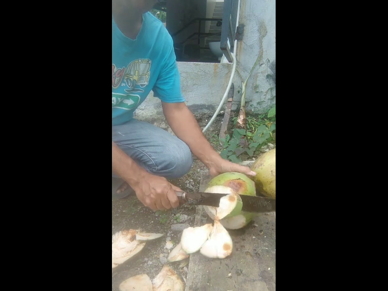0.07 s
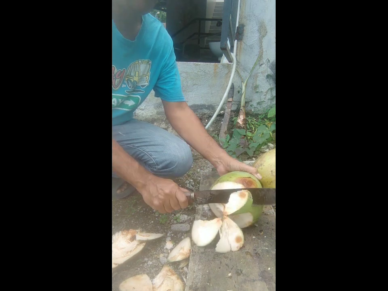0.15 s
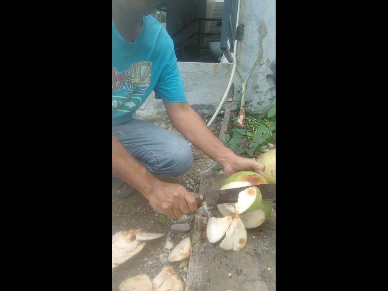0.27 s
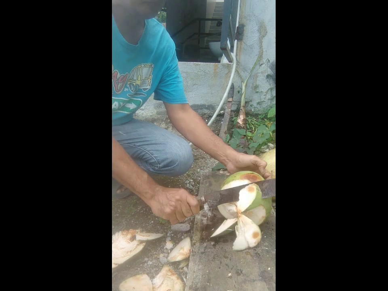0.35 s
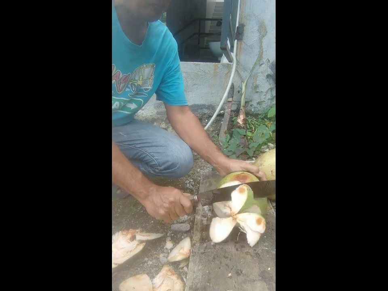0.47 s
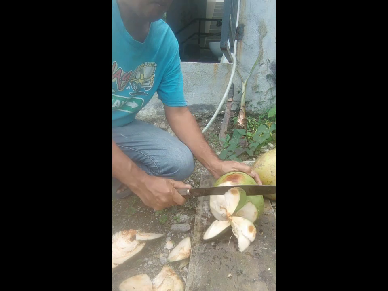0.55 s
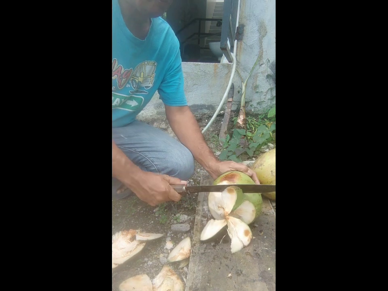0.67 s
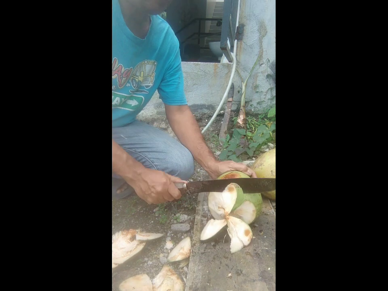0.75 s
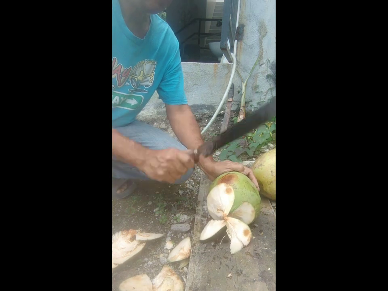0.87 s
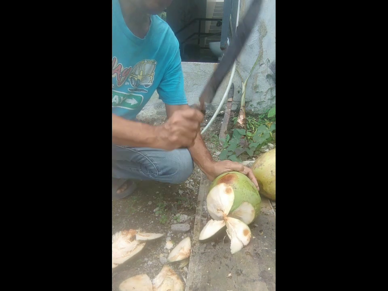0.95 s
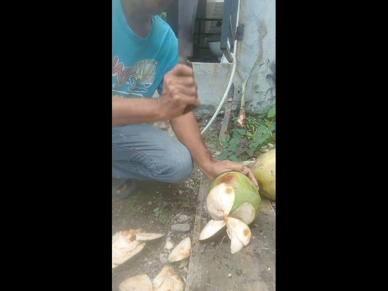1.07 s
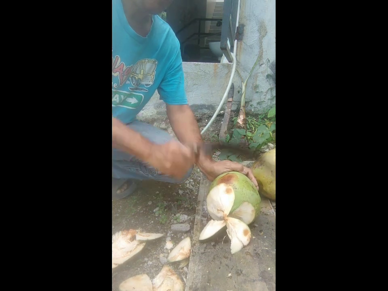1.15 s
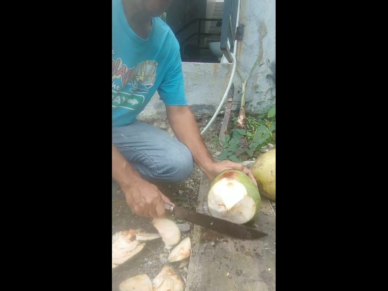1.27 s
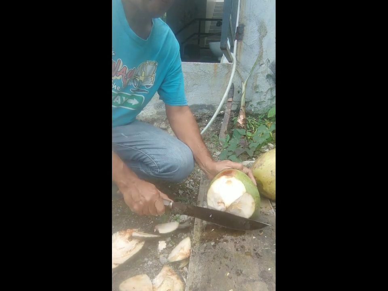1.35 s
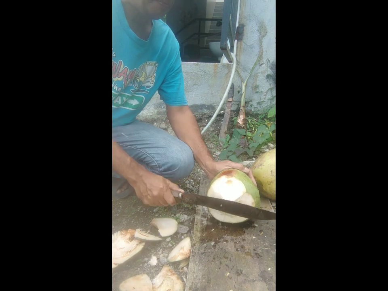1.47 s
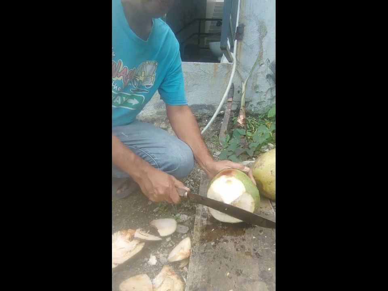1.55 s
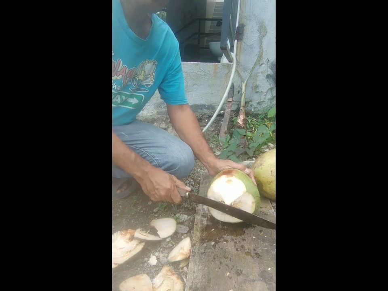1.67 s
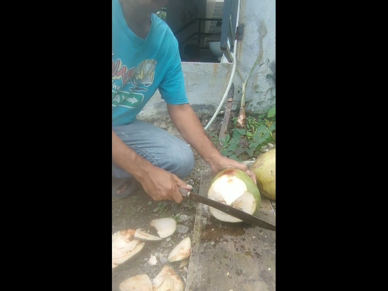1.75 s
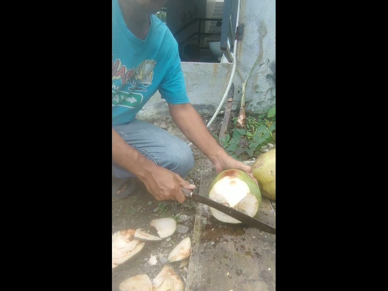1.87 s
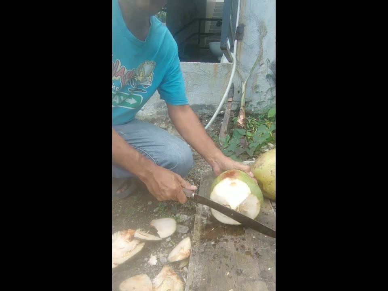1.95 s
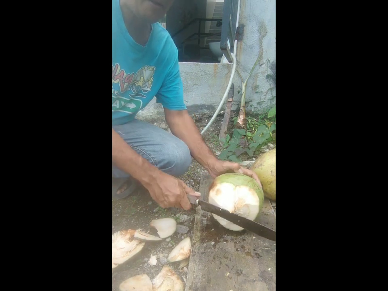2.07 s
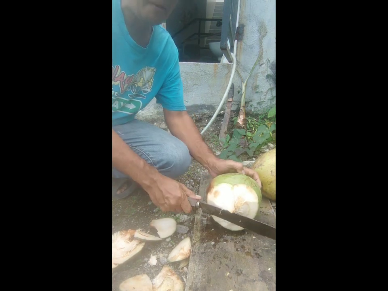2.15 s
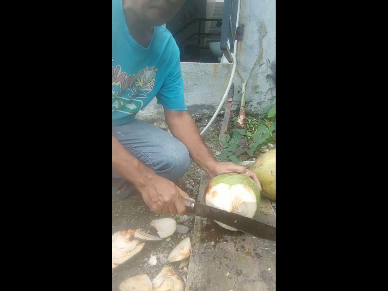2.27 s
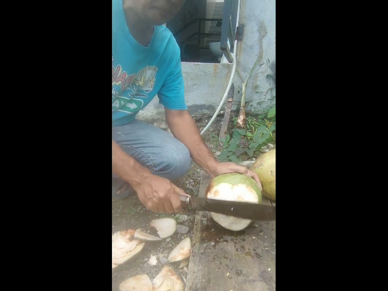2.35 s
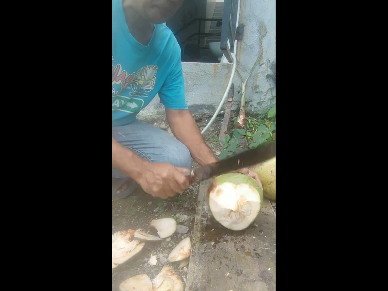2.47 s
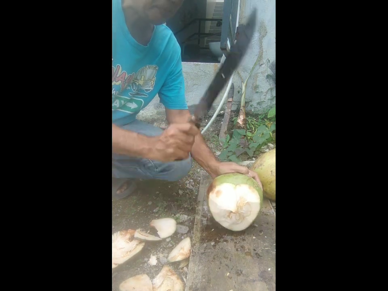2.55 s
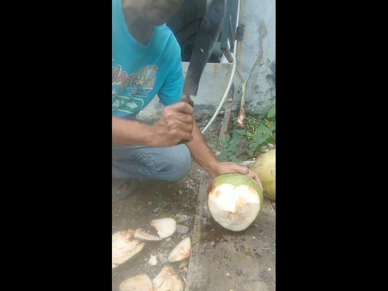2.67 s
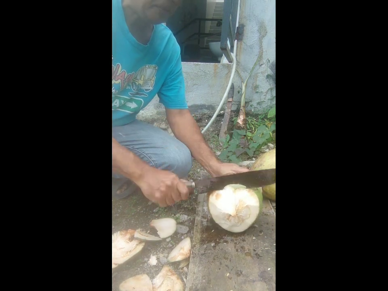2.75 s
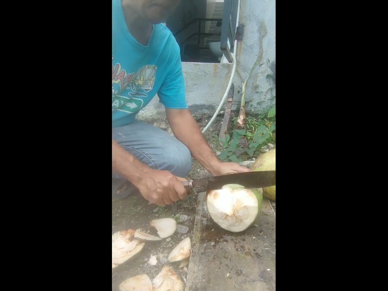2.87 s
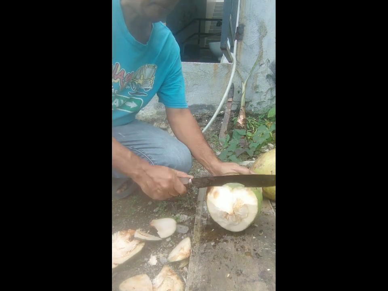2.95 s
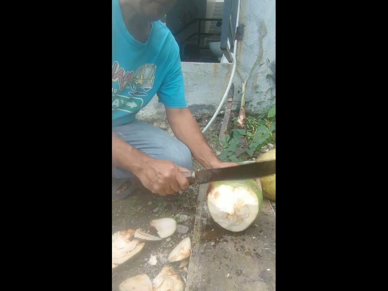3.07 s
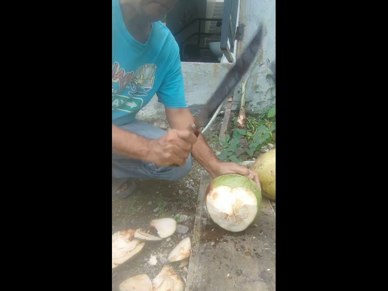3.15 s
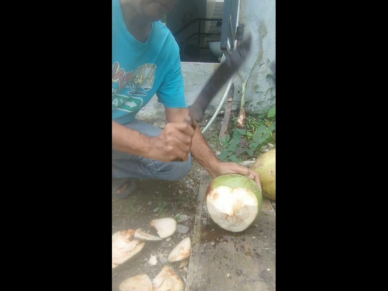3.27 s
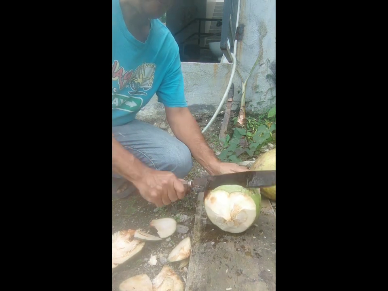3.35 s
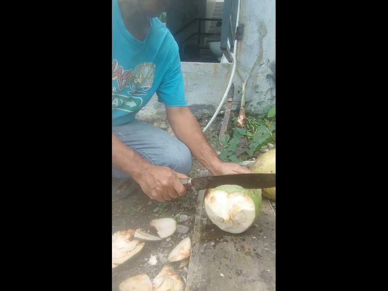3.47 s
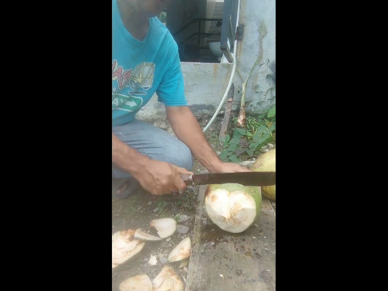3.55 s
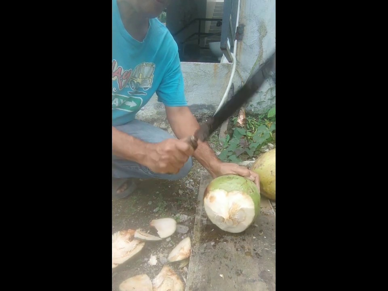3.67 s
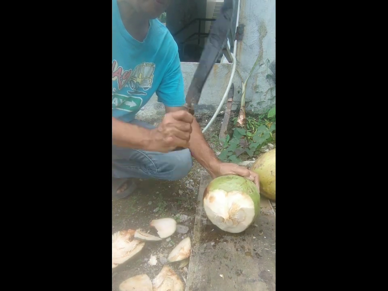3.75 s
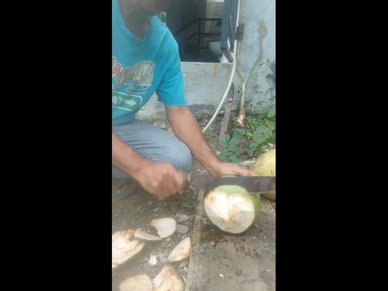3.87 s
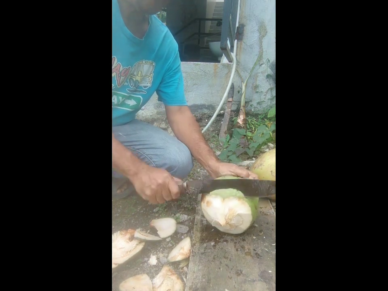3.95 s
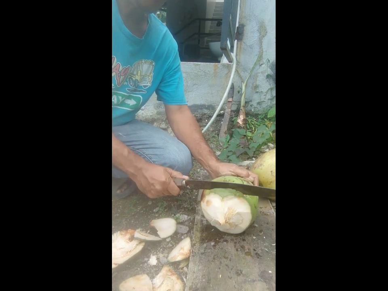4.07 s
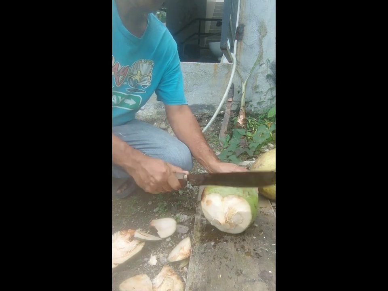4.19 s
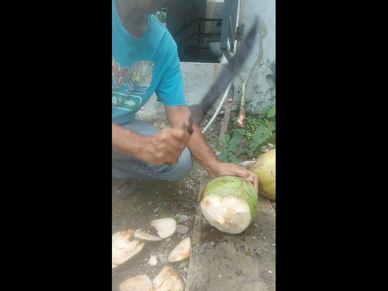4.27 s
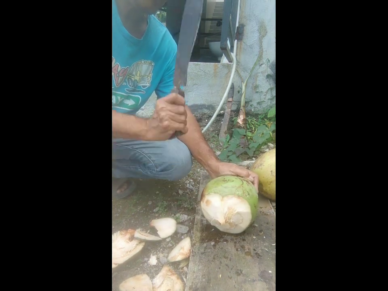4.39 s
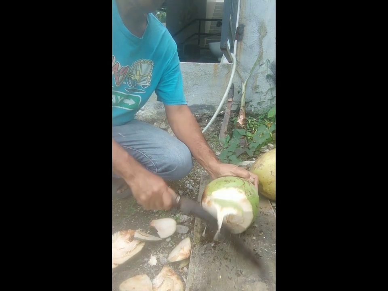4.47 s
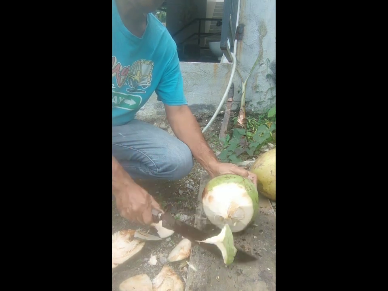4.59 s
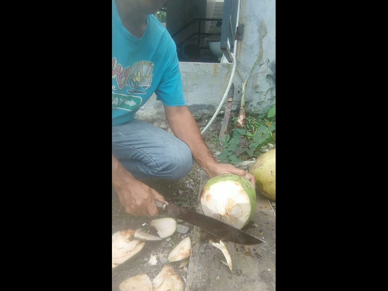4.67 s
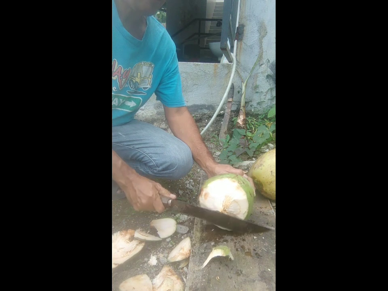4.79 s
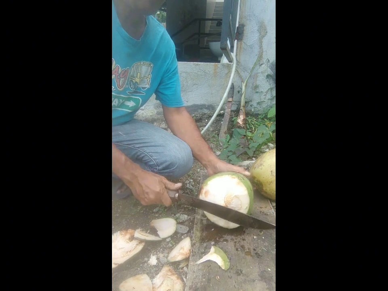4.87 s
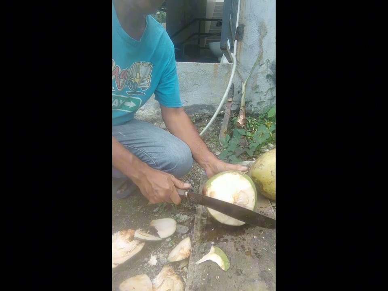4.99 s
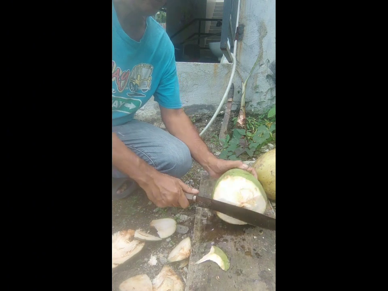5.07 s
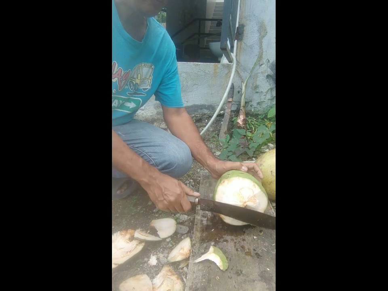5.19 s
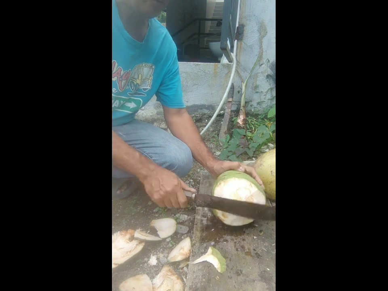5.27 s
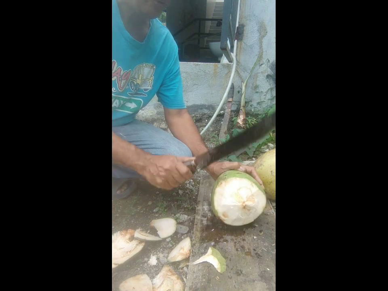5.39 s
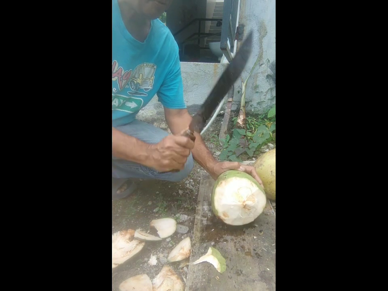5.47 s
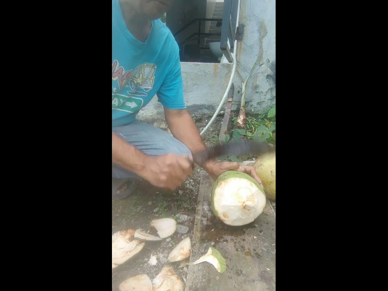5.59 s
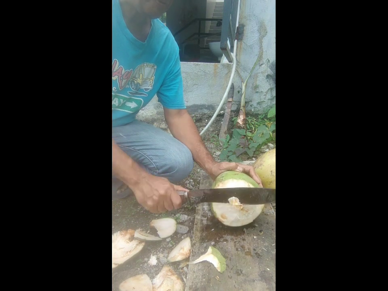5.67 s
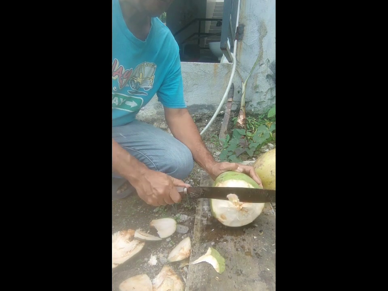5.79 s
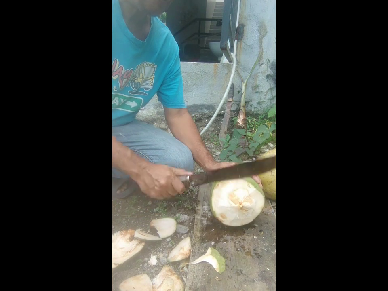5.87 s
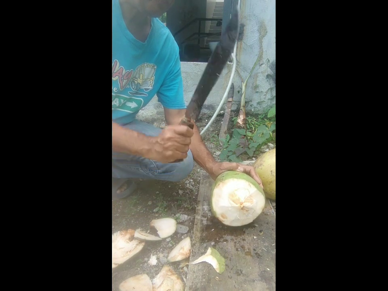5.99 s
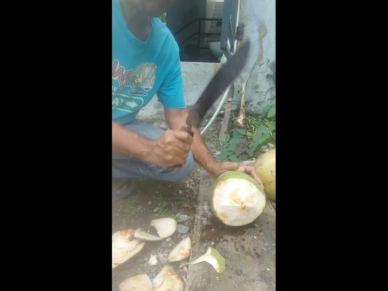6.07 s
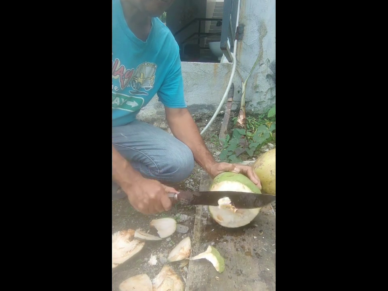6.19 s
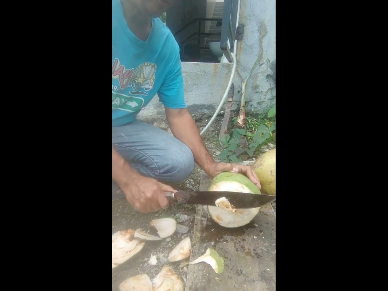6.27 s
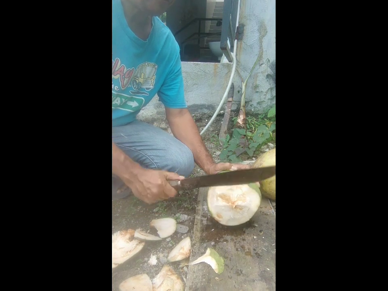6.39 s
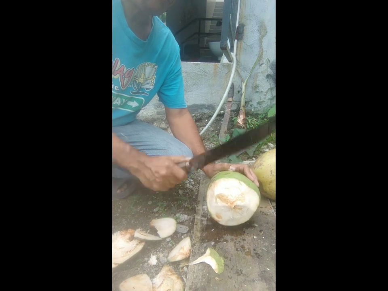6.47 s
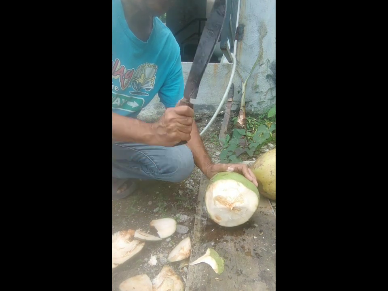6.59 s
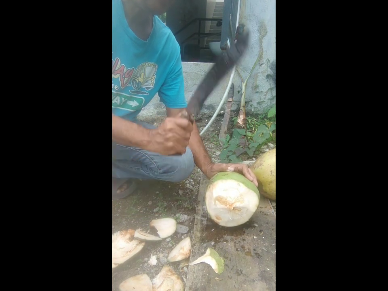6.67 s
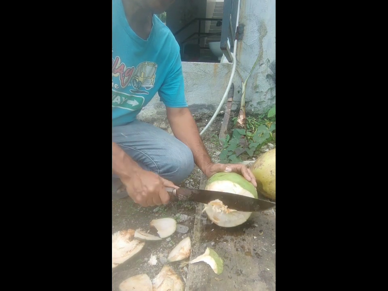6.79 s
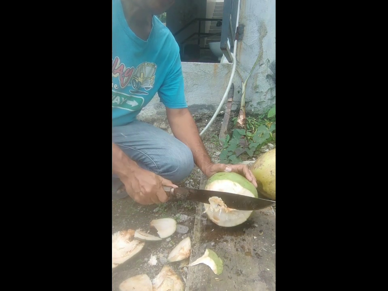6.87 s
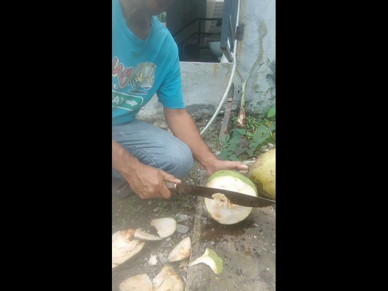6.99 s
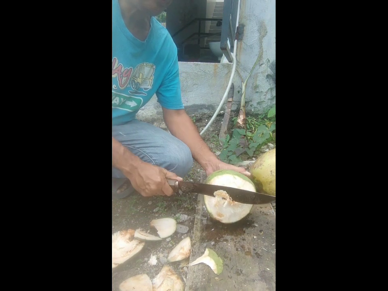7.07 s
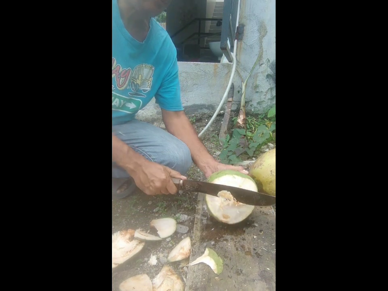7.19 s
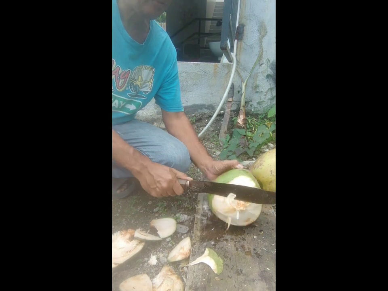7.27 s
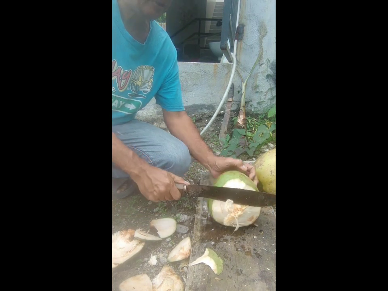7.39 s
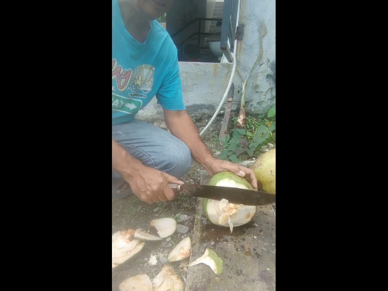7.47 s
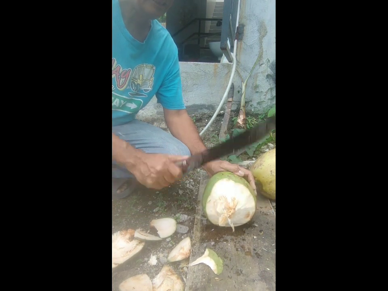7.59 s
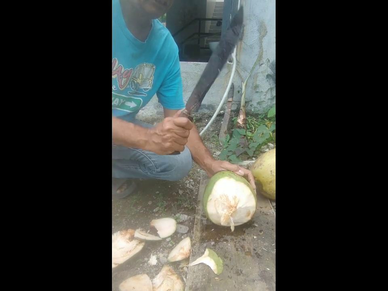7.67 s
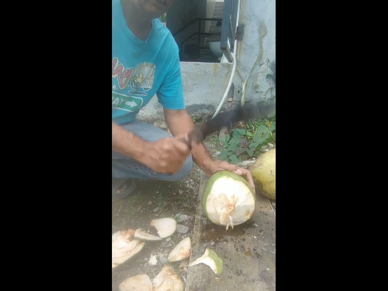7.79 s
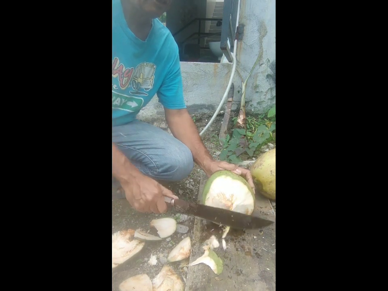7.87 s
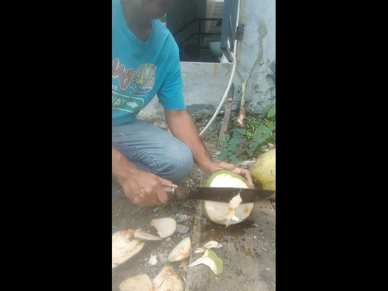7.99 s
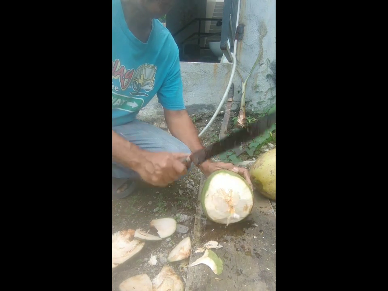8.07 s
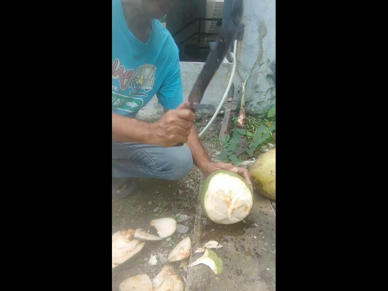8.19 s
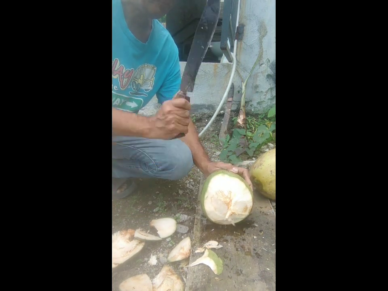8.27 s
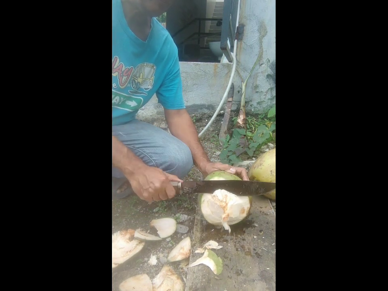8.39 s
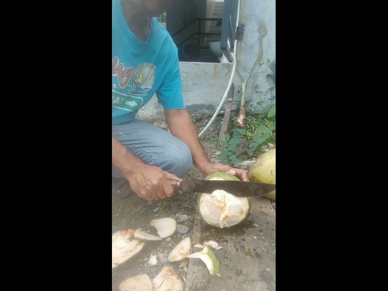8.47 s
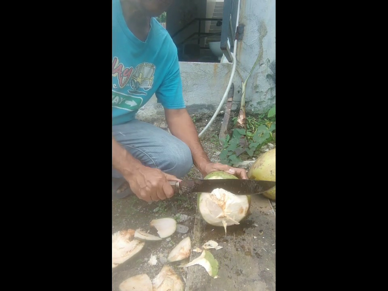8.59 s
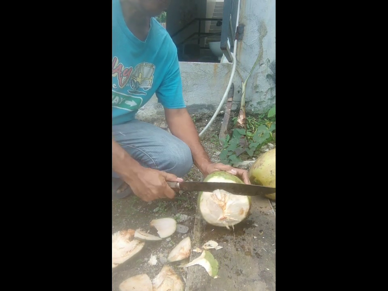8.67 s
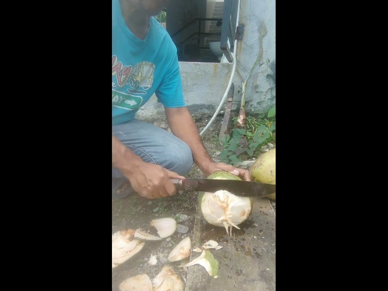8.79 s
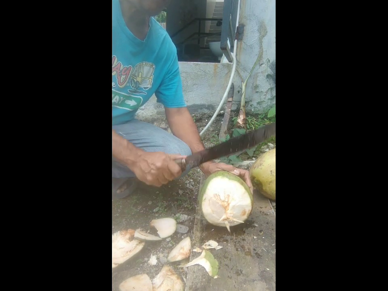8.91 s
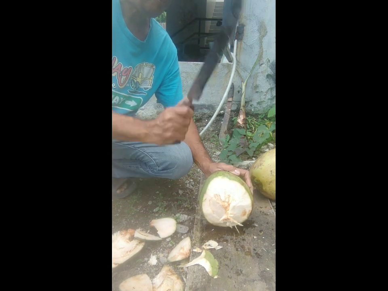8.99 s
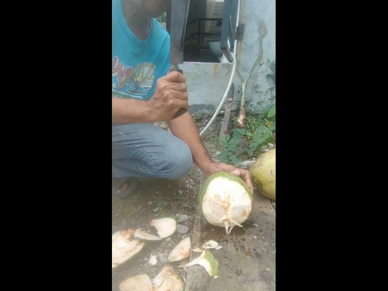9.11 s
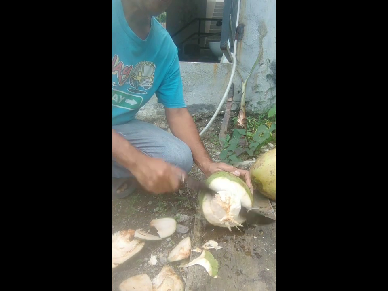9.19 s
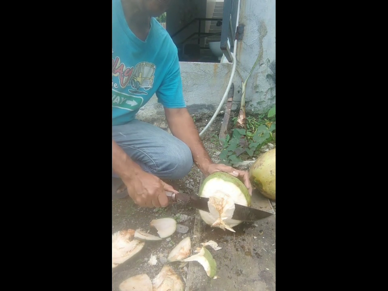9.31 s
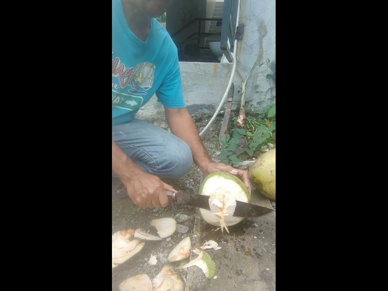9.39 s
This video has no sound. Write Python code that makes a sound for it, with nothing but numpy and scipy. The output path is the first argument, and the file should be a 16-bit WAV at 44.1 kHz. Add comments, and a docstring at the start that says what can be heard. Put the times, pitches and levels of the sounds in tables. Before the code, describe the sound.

Close, crisp machete chops split coconut husk about every half second, pieces knocking on hard ground, while light wind buffets the microphone.

```python
"""A soft knock and thud on hard ground come first, then far, rough bird chirps over wind and a steady hiss.
Outdoors in a yard, close to a phone, a long steel blade chops into the wet husk of a green coconut.
Shaped noise bursts are the cracking fibres; damped sines are the wedging edge, knocking pieces and thudding nut.
Gritty noise scrapes and rolls, and steel modes ring while the blade is free.
Behind them low noise and single cycles buffet the microphone, and wavering sines are the birds."""
import sys
import numpy as np
from scipy import signal
from scipy.fft import rfft, irfft
from scipy.io import wavfile
from scipy.ndimage import uniform_filter1d

SR = 44100
rng = np.random.default_rng(int(sys.argv[2]) if len(sys.argv) > 2 else 0)


def gain_from_db(level_db):
    """Convert decibel levels to linear amplitude factors (20 dB per decade)."""
    decades = np.asarray(level_db, float) / 20
    return 10 ** decades


def bounce(signal):
    """Save signal as a 16-bit WAV file at the path given by the first command-line argument."""
    frames = np.transpose(np.atleast_2d(signal))
    limited = np.clip(frames, -1, 1)
    pcm = np.round(limited * 32767).astype(np.int16)
    wavfile.write(sys.argv[1], SR, pcm)


N = 416304


def unit(x):
    """Scales a sound to rms 1."""
    return x / np.sqrt(np.mean(x ** 2))


def colour(x, points):
    """Shapes the spectrum of a noise by (f/Hz, level/dB) points, joined over log frequency."""
    hz, db = np.transpose(points)
    f = np.maximum(np.arange(N // 2 + 1) * SR / N, 1)
    gain = gain_from_db(np.interp(np.log(f), np.log(hz), db))
    return irfft(rfft(x) * gain, N)


def halves(x):
    """The parts under and over 5250 Hz, each at rms 1."""
    filters = [signal.butter(4, 5250, kind, fs=SR, output="sos") for kind in ("low", "high")]
    return [unit(signal.sosfilt(sos, x)) for sos in filters]


def track(table, silent=-120.):
    """Columns of a curve, one value a sample; outside the curve they take the value silent."""
    s, *columns = np.transpose(table)
    t = np.arange(N) / SR
    return [np.interp(t, s, column, silent, silent) for column in columns]


def walk(rate):
    """Random levels held 1 / rate s and slewed twice; spread near 1."""
    k = int(SR / rate)
    held = np.repeat(rng.standard_normal(N // k + 1), k)
    return 1.13 * uniform_filter1d(uniform_filter1d(held, k), k)[:N]


def crackle(flicker_db, rate):
    """Noise whose level jumps quickly, as many small snaps."""
    return rng.standard_normal(N) * gain_from_db(flicker_db * walk(rate))


def slopes(s, db, swell_s, fade_s):
    """A gain that climbs to db at time s and falls again, 20 dB in each time (2 ms at least)."""
    t = np.arange(N) / SR - s
    steps = np.where(t < 0, -t / max(swell_s, .002), t / max(fade_s, .002))
    return gain_from_db(db - 20 * np.minimum(steps, 5))


def add(out, s, sound):
    """Mixes a sound in from time s."""
    i = int(s * SR)
    out[..., i:i + sound.shape[-1]] += sound[..., :N - i]


def echo(x, db, t60, gap):
    """A diffuse, fading return that starts after gap s."""
    t = np.arange(SR // 2) / SR
    tail = rng.standard_normal(len(t)) * np.exp(-np.log(1000) * t / t60) * (t > gap)
    return gain_from_db(db) * signal.fftconvolve(x, tail / np.sqrt(np.sum(tail ** 2)))[:N]


# spectrum of cracking fibres: f/Hz, relative level/dB
CRUNCH = [(290, -26), (500, -19), (1280, -18.5), (2130, -16), (2690, -11.5), (3400, -7), (5120, -11),
          (5670, -17), (6760, -4), (7600, 8), (8800, -6), (9890, -4.5), (13100, -19.5), (15800, -45),
          (16500, -64.5)]
# bursts of husk fibres cracking: t/s of the top, level/dB above the split, level/dB below it,
# half the length of the swell/ms, t60/ms
CRACKS = [(0.5838, -41, -40, 0.4, 8.9), (0.619, -28, -34, 0.4, 9.4), (0.6567, -32, -38, 0.3, 9),
          (0.707, -34, -54, 1.3, 11), (1.2343, -14.5, -14, 0.85, 54), (1.243, -21, -23, 1.1, 16),
          (1.2472, -32, -6, 1.25, 6.2), (1.2587, -37, -7, 0.29, 3.7), (1.2616, -28, -30, 0.3, 8),
          (1.3581, -19, -27, 0.12, 11), (1.371, -40, -24.5, 0.51, 8.4), (1.3876, -34, -34, 0.28, 13),
          (1.4495, -37, -52, 1.8, 20), (1.477, -45, -38, 2.7, 18), (1.486, -34, -56, 1.6, 25),
          (1.508, -45, -28, 1.4, 12), (1.551, -22.5, -48, 1.6, 8), (1.56, -28, -47, 2, 11),
          (1.579, -40, -44, 1.5, 6.9), (1.6415, -28, -36, 0.43, 7.4), (2.023, -43, -47, .4, 8),
          (2.0702, -36, -40, 0.33, 5.9), (2.076, -46, -28.5, 0.48, 15), (2.8237, -18, -10.5, 1.3, 16),
          (2.8304, -36, -25.5, 1.8, 16), (3.3982, -12, -10.5, 0.9, 13.7), (3.4055, -28.5, -23, 1.3, 10),
          (3.414, -51, -32, 2.2, 9.8), (3.948, -18, -8, 0.28, 20.7), (3.9583, -20.5, -33, 2.2, 8),
          (3.965, -39, -32, 1.7, 50), (4.085, -43, -45, .5, 8), (4.1466, -37, -34, 0.3, 8),
          (4.537, -22, -10, 0.29, 18), (4.5466, -14, -23, 3.8, 14), (4.575, -47, -29, 0.24, 6.4),
          (4.64, -37, -55, 1.8, 33), (4.8718, -46, -35.5, 0.63, 11), (5.1868, -41, -37, 0.3, 26),
          (5.694, -16, -24.5, 1.1, 42), (5.6986, -17, -23, 1, 16), (6.2068, -19, -20, 0.5, 34),
          (6.2114, -24, -12, 0.5, 6.9), (6.2159, -11, -15, .8, 23.4), (6.817, -16, -14.5, 1.2, 32),
          (6.829, -20, -19, 1.4, 19), (6.958, -50, -45, 0.36, 7.4), (7.292, -45, -43, 2, 20),
          (7.306, -45, -42, 2.8, 12), (7.3295, -36, -37, 1.0, 20), (7.3352, -33, -37, 1.5, 15),
          (7.3505, -36, -44, 2.1, 42), (7.9056, -12.5, -17.5, 2.1, 25), (7.9123, -18.5, -28, 1.8, 33),
          (7.921, -17, -28.5, 0.4, 20), (8.4386, -13, -14.5, 0.48, 14), (8.444, -28, -24.5, 3.1, 38),
          (8.7524, -50, -35, 0.3, 8), (8.9, -42, -42, .6, 10), (9.2799, -13.5, -21, 3.6, 55),
          (9.2865, -14, -15.5, 2.9, 9.6), (9.2939, -21, -26, 0.6, 15), (9.306, -23, -25, 0.46, 8.9)]


def cracks():
    """Each burst swells for a few ms as the edge bites, then dies away; bursts add in power."""
    low, high = halves(colour(crackle(2.5, rate=1500), CRUNCH))
    power = np.zeros((2, N))
    t = np.arange(-SR // 50, SR // 5) / SR * 1000  # ms from the top
    for s, high_db, low_db, swell_ms, t60_ms in CRACKS:
        swell = np.maximum(1 + t / (2 * swell_ms), 0)
        shape = np.where(t < 0, swell, np.exp(-np.log(1000) * t / t60_ms))
        add(power, s - 1 / 50, (gain_from_db([[low_db], [high_db]]) * shape) ** 2)
    return np.sqrt(power[0]) * low + np.sqrt(power[1]) * high


# the cleft ringing briefly as the edge wedges in: t/s, peak level/dB, settled f/Hz, t60/s
TOCKS = [(1.2465, -14.5, 2830, 0.0074), (2.8239, -13.5, 3400, 0.0051), (3.4, -30, 3700, 0.0089),
         (3.9468, -13, 3600, 0.014), (4.5358, -2.5, 3300, 0.0047), (5.6997, -8, 3240, 0.012),
         (6.2122, -7, 3350, 0.0087), (6.8149, -11, 3210, 0.012), (7.9034, -6.5, 4250, 0.0051),
         (8.4389, -6, 3140, 0.0083), (9.2768, -7.5, 4090, 0.0078)]


def tocks():
    """One woody resonance, swelling over a few cycles, its pitch sagging as the cleft opens."""
    out, t = np.zeros(N), np.arange(SR // 20) / SR
    sharp, settle_s = 0.038, 0.0018  # starts this share sharp; time constant of the sag
    for s, db, hz, t60 in TOCKS:
        shape = (1 - np.exp(-t / 0.00027)) * np.exp(-np.log(1000) * t / t60)
        turns = hz * (t + sharp * settle_s * (1 - np.exp(-t / settle_s)))
        add(out, s, gain_from_db(db) * shape / shape.max() * np.sin(2 * np.pi * turns))
    return out


# modes of a husk piece: multiple of its pitch, level/dB, length of ring as a multiple of its t60
HUSK = [(0.551, -10, 1.1), (.8, -24, 5.0), (1.021, -2.5, 1.1), (1.35, -11, .7), (1.75, -3.5, .45),
        (2.3, 0.5, .3), (3.1, 8, .2)]
# cut pieces knocking on the ground, and the husk jarred by the edge: t/s (1.3 ms ahead of the onset),
# peak level/dB of the body, nominal f/Hz, nominal t60/s, rattle level/dB relative to the body's peak
KNOCKS = [(0.009, -25, 410, 0.051, -18), (1.2565, -4, 540, 0.026, -9), (1.2813, -13, 495, 0.039, -21),
          (1.357, -12.5, 614, 0.041, -15), (1.369, -19.5, 765, 0.022, -17), (1.505, -24, 1200, 0.022, -14),
          (1.64, -36, 1000, .02, -13), (2.075, -37, 1550, .02, -14), (2.83, -19, 440, 0.031, -1.5),
          (3.395, -13, 925, 0.032, -19), (3.404, -11, 616, 0.029, -6.5), (3.946, -14, 830, 0.039, -10),
          (3.955, -17, 450, 0.036, -6.5), (4.534, -13.5, 492, 0.036, -3.5), (4.571, 0.5, 862, 0.018, -13),
          (4.625, -8, 470, 0.026, -9.5), (5.183, -26.5, 474, 0.057, -7.5), (5.696, -25, 395, 0.085, -20),
          (6.216, -29, 810, 0.049, -9.5), (6.814, -30, 431, 0.1, -15), (7.905, -20.5, 912, 0.03, -23),
          (8.445, -16, 784, 0.044, -11), (9.285, -30.5, 590, 0.058, -2.5)]


def knocks():
    """A hard contact gives one sharp cycle, the pop; damped husk modes and a rattle follow."""
    out, t = np.zeros(N), np.arange(SR // 4) / SR
    chance = rng.random((len(KNOCKS), len(HUSK)))
    grit_shape = [(200, -22), (450, 0.5), (750, -1), (1400, -7.0), (3000, -28.0)]
    grit = unit(colour(crackle(4.0, rate=300), grit_shape))
    for (s, db, hz, t60, rattle_db), draws in zip(KNOCKS, chance):
        fade = np.log(1000) * t / t60
        pop = np.sin(2 * np.pi * np.minimum(1.28 * hz * t, 1))
        modes = 0
        for (ratio, mode_db, length), u in zip(HUSK, draws):
            mode_hz = hz * ratio * (1 + 0.073 * (u - .5))  # tuned a little at random
            modes = modes + gain_from_db(mode_db) * np.sin(2 * np.pi * mode_hz * t) * np.exp(-fade / length)
        body = (gain_from_db(4.5) * pop + modes) * (1 - np.exp(-t / 0.0008))
        i = min(int(s * SR), N - len(t))
        rattle_shape = (1 - np.exp(-t / 0.0011)) * np.exp(-.55 * fade)
        rattle = gain_from_db(rattle_db) * grit[i:i + len(t)] * rattle_shape
        add(out, s + 0.001306, gain_from_db(db) * (rattle - body / np.abs(body).max()))
    return out


# the whole nut thumping the ground: t/s, level/dB before onset and fade, settled f/Hz, t60/s
THUDS = [(0.009, -31, 265, 0.052), (1.263, -20.5, 156, 0.13), (1.352, -42, 204, 0.054),
         (2.834, -14, 167, 0.062), (3.408, -3, 158.6, 0.029), (3.955, -7, 147, 0.046),
         (4.546, -24, 154, 0.11), (4.577, -28, 193, 0.088), (4.626, -28, 205, 0.03),
         (5.192, -24.5, 188, 0.11), (6.213, -36, 164, 0.052), (6.815, -27, 177, 0.078),
         (8.449, -16, 143, 0.075), (9.286, -31.5, 158, 0.13)]


def thuds():
    """A soft, heavy push: a few low cycles whose pitch sags, with a briefer overtone."""
    out, t = np.zeros(N), np.arange(SR // 5) / SR
    for s, db, hz, t60 in THUDS:
        turns = 2 * np.pi * hz * (t + 0.0014 * (1 - np.exp(-t / 0.0039)))
        fade = np.exp(-np.log(1000) * t / t60)
        tone = np.sin(turns) + gain_from_db(-6) * fade * np.sin(2.14 * turns)
        add(out, s, gain_from_db(db) * (1 - np.exp(-t / 0.0013)) * fade * tone)
    return out


# spectrum of the friction: f/Hz, relative level/dB
RASP = [(410, -29), (700, -10), (1450, -13.5), (1910, -6), (2360, -11), (3080, -5), (5290, -13.5),
        (7770, -1), (13500, -24), (15900, -39), (16500, -47.5)]
# blade and husk pieces rubbing: t/s of the top, level/dB above the split, level/dB below it,
# swell/s, fade/s (both for 20 dB; anything under 0.002 s, also below zero, acts as 0.002 s)
SCRAPES = [(0.62, -48, -61, .1, 0.1), (0.704, -53.5, -55, .02, 0.1), (0.874, -56.5, -63, .15, .12),
           (1.35, -43, -46, 0.083, 0.1), (1.47, -37, -41, 0.041, 0.11), (1.556, -45, -43, 0.037, 0.18),
           (1.52, -41, -45.5, 0.032, 0.01), (1.66, -48, -53, .03, -0.14), (1.79, -51.5, -51, 0.24, 0.3),
           (2.06, -58, -54, 0.16, 2.3), (3.038, -51.5, -52, 0.12, 0.25), (3.598, -43.5, -48.5, 0.073, 0.13),
           (3.64, -66, -59, 0.017, 0.5), (4.169, -42, -48, 0.06, 0.03), (4.25, -54, -55, 0.14, -0.24),
           (4.606, -35, -38, 0.027, -0.06), (4.72, -51.5, -63, .03, 0.1), (5.115, -55, -71, .04, -0.1),
           (5.2, -58, -50, .02, -0.7), (5.354, -54, -51, 0.031, -0.5), (6.86, -51, -49, .04, .16),
           (7.301, -48, -47, 0.02, -0.04), (7.345, -45, -48, .04, .09), (8.908, -56.5, -57, 0.13, 0.35)]


def scrapes():
    """Gritty friction of steel and fibre, and the split husk settling after every chop."""
    uneven = gain_from_db(2 * walk(90))
    low, high = halves(colour(crackle(4.4, rate=500) * uneven, RASP))
    # 14 ms after each wedging of the edge, fading 20 dB in 0.13 s
    settling = [(s + 0.014, -48.5, -52.5, .005, .13) for s, *_ in TOCKS]
    out = 0
    for s, high_db, low_db, swell_s, fade_s in SCRAPES + settling:
        out = out + slopes(s, 0, swell_s, fade_s) * (gain_from_db(high_db) * high + gain_from_db(low_db) * low)
    return out


# a hollow husk piece rocking on the ground: t/s of the top, level/dB, f/Hz, swell/s, fade/s (both for 20 dB)
ROLLS = [(1.33, -42, 1000, 0.033, 0.05), (1.478, -46, 1000, .02, .02), (1.565, -44.5, 690, .04, .04),
         (1.735, -50, 1100, .03, .04), (4.69, -48, 650, 0.1, 0.2)]


def rolls():
    """Fine bumps sounding through one steep, hollow resonance."""
    out, bumps = 0, crackle(3.7, rate=120)
    width = 0.41  # of each of the two filter passes, as a share of the pitch
    for s, db, hz, swell_s, fade_s in ROLLS:
        hollow = signal.iirpeak(hz, 1 / width, fs=SR)
        rumble = signal.lfilter(*hollow, signal.lfilter(*hollow, bumps))
        out = out + slopes(s, db, swell_s, fade_s) * unit(rumble)
    return out


# blade modes: f/Hz, level/dB added to its group's, group of modes it follows (0, 1 or 2)
BLADE = [(4926, 8, 0), (5950, -2, 1), (6875, 2.5, 2), (7752, -37, 2), (8900, -10, 2), (12600, -24, 0),
         (14190, -38, 0), (15650, -22, 0)]
# the blade ringing while free of the husk: t/s, time until it is damped/s, level/dB of the three groups
RINGS = [(0.84, .04, -66, -80, -75), (0.885, .1, -59, -79, -66), (1.262, .13, -51, -44, -37.5),
         (1.58, .08, -53, -63, -60), (1.755, .07, -58, -49, -44), (1.783, 0.033, -62, -37, -43),
         (3.03, .03, -70, -70, -52), (3.113, .11, -51, -67, -62), (3.56, .04, -60, -70, -65),
         (3.592, .03, -53.5, -67, -48), (3.64, .06, -74, -72, -43.5), (4.145, 0.047, -60, -62, -59),
         (4.23, .1, -62, -73, -57), (4.548, .05, -46, -44, -50), (4.585, .2, -66, -45, -46),
         (4.62, .16, -55, -63, -69), (4.87, 0.055, -58, -77, -63), (5.357, 0.06, -59, -74, -80),
         (6.819, .03, -50, -45, -20), (7.915, .17, -48, -49, -67), (8.9, .06, -67, -74, -62)]


def blade():
    """Steel modes that ring on until husk or hand damps them, their strength wavering a little at random."""
    gains, t = np.zeros((3, N)), np.arange(N) / SR
    swell_s, damped_s = .007, .05  # times for 20 dB
    fades = (1.1, 1.2, .8)  # time for 20 dB while free, per group, in lengths of the ring
    for s, length, *dbs in RINGS:
        free = slopes(s + length, 0, np.inf, damped_s)
        gains += [free * slopes(s, db, swell_s, fade * length) for db, fade in zip(dbs, fades)]
    out = 0
    for hz, db, group in BLADE:
        wavering = gain_from_db(db + 2.6 * walk(40))
        out = out + wavering * gains[round(group)] * np.sin(2 * np.pi * hz * t)
    return np.sqrt(2) * out


# the blade squeaking along the wet husk: t/s, slip rate f/Hz, level/dB before each partial's own
SQUEAK = [(1.74, 660, -66), (1.757, 735, -52), (1.77, 770, -52.5), (1.787, 755, -48.5), (1.8, 710, -68)]


def squeak():
    """Stick and slip, a little uneven, at a rate that rises and then eases; heard as upper partials."""
    hz, db = track(SQUEAK)
    turns = np.cumsum(np.maximum(hz, 0) * (1 + .02 * walk(250))) / SR
    out = 0
    for k, partial_db in [(2, 6), (3, 5.0), (4, 2), (5, 0), (6, 1)]:
        out = out + gain_from_db(partial_db + 4.0 * walk(120)) * np.sin(2 * np.pi * k * turns)
    return gain_from_db(db) * out


# strong single buffets of wind: t/s (6 ms ahead of the top), level/dB of the main swing, f/Hz
BUFFETS = [(2.168, -42.5, 196), (2.35, -34, 100), (2.404, -29, 127), (2.448, -37.5, 132), (2.499, -26, 104),
           (2.924, -32, 174), (2.986, -31, 108), (4.856, -24, 184), (4.888, -20.5, 140), (4.914, -30, 144),
           (4.951, -24.5, 130), (4.993, -29.5, 152), (5.136, -30.5, 113), (5.157, -34, 111),
           (5.272, -33, 112), (5.384, -31, 142), (5.435, -33.5, 111), (5.492, -32, 110), (6.008, -31, 101),
           (6.083, -28.5, 121), (6.272, -40, 159)]


def buffets():
    """An eddy crossing the microphone port: one or two lopsided low cycles that swell and fade."""
    out, t = np.zeros(N), np.arange(-SR // 40, SR // 20) / SR
    for s, db, hz in BUFFETS:
        sharper = 0.56 * np.cos(2 * np.pi * 1.83 * hz * t) * np.exp(-(t / 0.0024) ** 2)
        swing = np.cos(2 * np.pi * hz * t) + sharper
        cycles = np.where(t < 0, .55, .9)  # quicker to swell than to fade
        add(out, s + 0.00608 - 1 / 40, gain_from_db(db) * swing * np.exp(-.5 * (t * hz / cycles) ** 2))
    return out


# spectrum of the deep wind: f/Hz, relative level/dB
GUST = [(12, -54), (20, -32), (27, -15), (50, -5), (81, 1.5), (130, 0.5), (200, -12.5), (260, -54),
        (440, -120)]
# wind on the microphone: t/s, level/dB before the random puffs
WIND = [(0.0, -50.5), (0.94, -53), (1.29, -48.5), (1.97, -53.5), (2.28, -50.5), (2.42, -41.5), (3.02, -45),
        (4.29, -46.5), (4.68, -43.5), (5.05, -38.5), (5.15, -45), (5.55, -37), (5.81, -45), (6.94, -47),
        (7.31, -49.5), (8.41, -50.5), (8.86, -53), (9.44, -52.5)]


def wind():
    """Low turbulence that puffs unevenly; a part above the deep rumble follows it less steeply."""
    deep_db = track(WIND, silent=-60.)[0] + 1.1 * walk(5.5)
    upper_db = -61.5 + 0.42 * (deep_db + 52)  # 0.42 dB per dB of wind over a calm of -52 dB
    puffs = walk(28)
    deep = unit(colour(rng.standard_normal(N), GUST)) * gain_from_db(deep_db + 3.8 * puffs)
    upper_shape = [(120, -30), (190, 5.0), (400, -8.5), (900, -40), (2000, -69.5)]
    upper = unit(colour(rng.standard_normal(N), upper_shape))
    return deep + upper * gain_from_db(upper_db + 2.0 * puffs + 3.8 * walk(45))


def note(s, length, hz, db):
    """Curve (t/s, f/Hz, level/dB) of one steady pitch that starts quickly and weakens to its end."""
    swell_s, sag_db = 0.0072, 12
    return [(s, hz, db - sag_db), (s + swell_s, hz, db), (s + length, hz, db - sag_db)]


# far birds, a run of rough chirps: t/s, length/s, f/Hz, top level/dB
BIRDS = [(0.04, .05, 2650, -56), (0.345, 0.097, 2560, -52.5), (0.47, 0.055, 2790, -52.5),
         (0.599, .04, 2650, -51), (0.705, 0.035, 2640, -53), (0.8, .06, 2720, -53.5),
         (6.3, 0.058, 2550, -56)]
# far birds, piping notes of steady pitch: t/s, length/s, f/Hz, top level/dB
PIPING = [(3.582, 0.098, 1685, -70), (3.697, .17, 1688, -55.5), (4.098, .12, 1665, -62)]
# a falling whistle, then a lower falling branch, probably its echo; each a curve: t/s, f/Hz, level/dB
WHISTLE = [
    [(7.42, 3069, -69), (7.464, 3004, -50), (7.495, 2373, -60), (7.52, 2120, -70)],
    [(7.525, 2058, -59), (7.56, 1920, -57), (7.617, 1865, -51), (7.651, 1645, -48.5), (7.687, 1290, -57),
     (7.72, 1170, -73)],
]


def birds():
    """Thin, wavering whistles, blurred by a diffuse return from the trees."""
    out = 0
    rough, pure = .07, .01  # random waver as a share of the pitch
    calls = [(note(*chirp), rough) for chirp in BIRDS]
    calls += [(note(*pipe), pure) for pipe in PIPING]
    calls += [(branch, pure) for branch in WHISTLE]
    for call, waver in calls:
        hz, db = track(call)
        wavering_hz = np.maximum(hz, 0) * (1 + waver * walk(600))
        tone = np.sin(2 * np.pi * np.cumsum(wavering_hz) / SR)
        gain = uniform_filter1d(gain_from_db(db), size=300) * gain_from_db(3.4 * walk(50))
        out = out + np.sqrt(2) * gain * tone
    return out + echo(out, db=-2, t60=0.71, gap=0.012)


# spectrum of the outdoor hiss: f/Hz, relative level/dB per Hz
HISS = [(120, -27), (200, -3), (369, -9.5), (439, -10), (645, -10), (1020, -12), (1390, -9), (1710, -10),
        (4030, -7.5), (5620, -16), (7830, -7), (8400, -12), (10000, -22.5), (11100, -48.5), (13000, -64)]


def hiss():
    """Distant outdoor noise, smooth, swelling a little."""
    return unit(colour(rng.standard_normal(N), HISS)) * gain_from_db(-51.5 + 0.81 * walk(1.35))


def scene():
    """Close sounds come back briefly from the walls of the yard; wind, birds and hiss do not."""
    near = cracks() + tocks() + knocks() + thuds() + scrapes() + rolls() + blade() + squeak()
    yard = echo(near, db=-22.5, t60=0.25, gap=0.0054)
    return (near + yard + wind() + buffets() + birds() + hiss())[None]


def band_limit(x):
    """A steep low-pass at the top of the band."""
    return signal.sosfilt(signal.butter(12, 16790, fs=SR, output="sos"), x)


def record(dry):
    """The small microphone loses the deepest bass; the loudest peaks flatten under a ceiling; the top is cut."""
    thin = signal.sosfilt(signal.butter(2, 55, "high", fs=SR, output="sos"), dry)
    ceiling = .85  # of full scale
    held = thin / (1 + (thin / ceiling) ** 4) ** (1 / 4)
    mix = signal.sosfilt(signal.ellip(6, .2, 40, 15900, fs=SR, output="sos"), held)
    return band_limit(mix)


dry = scene()
out = record(dry)
bounce(out)
```